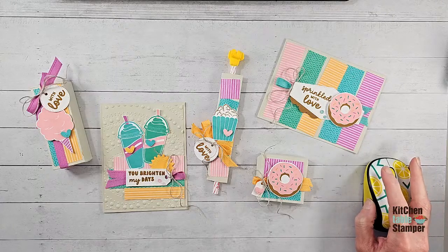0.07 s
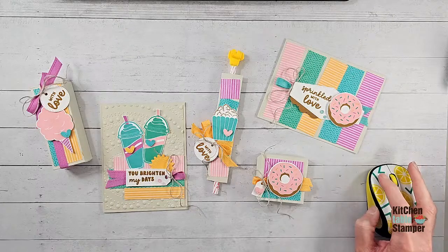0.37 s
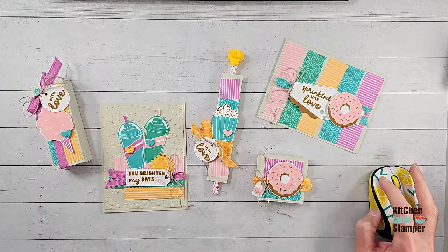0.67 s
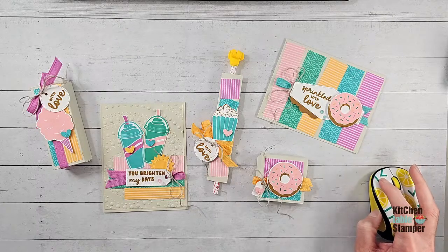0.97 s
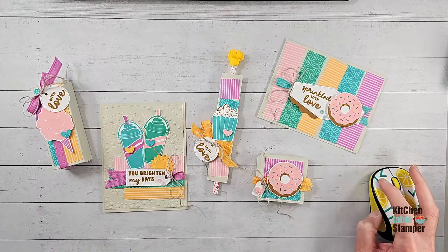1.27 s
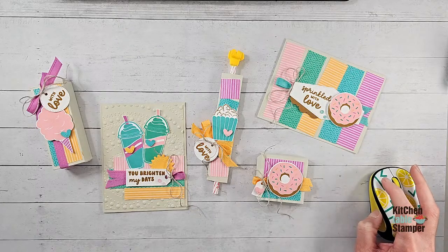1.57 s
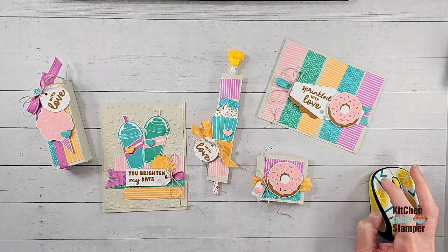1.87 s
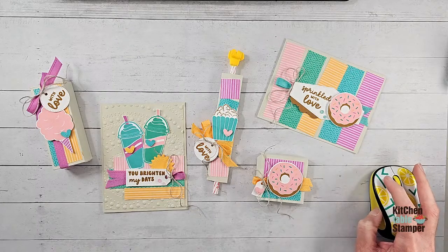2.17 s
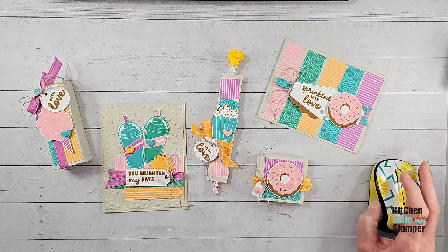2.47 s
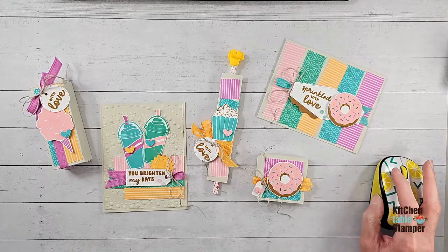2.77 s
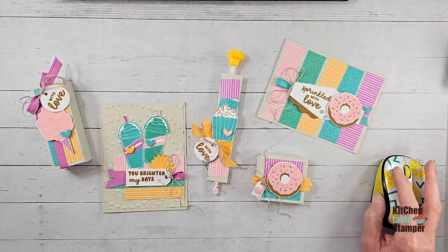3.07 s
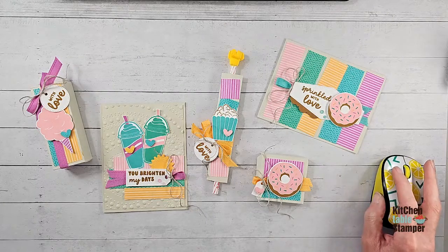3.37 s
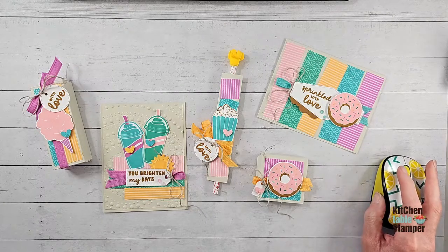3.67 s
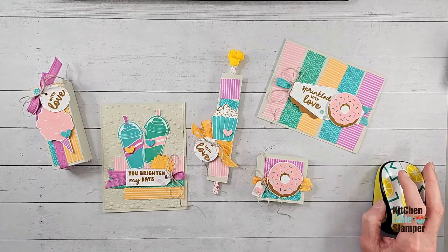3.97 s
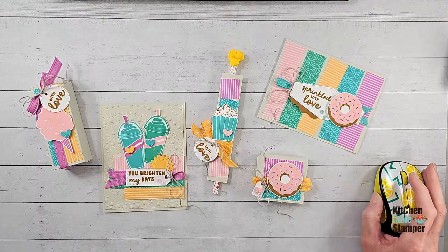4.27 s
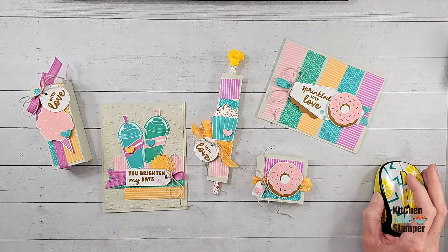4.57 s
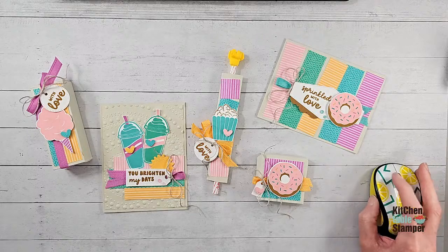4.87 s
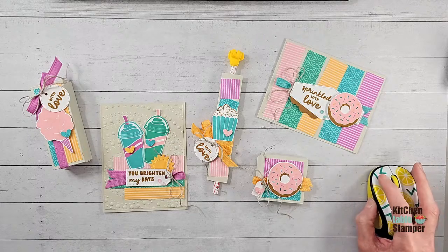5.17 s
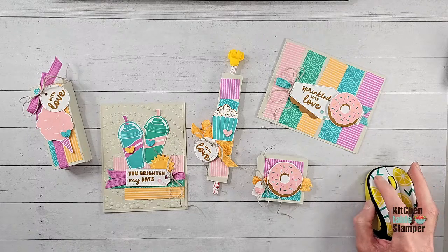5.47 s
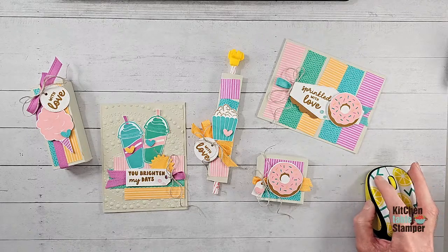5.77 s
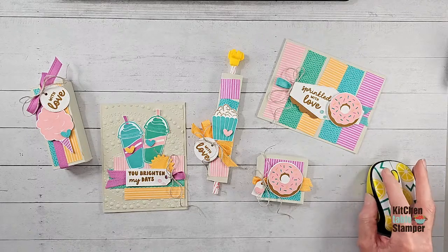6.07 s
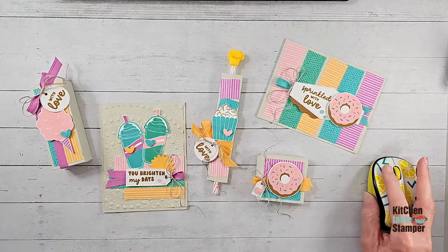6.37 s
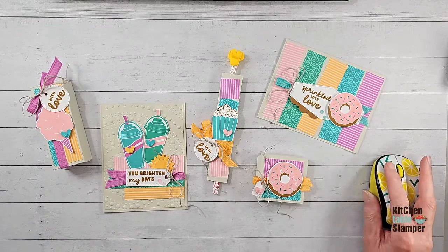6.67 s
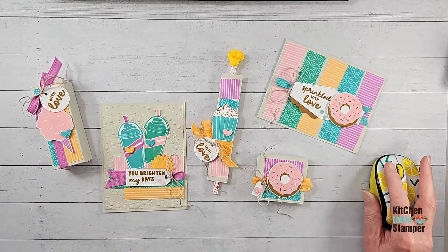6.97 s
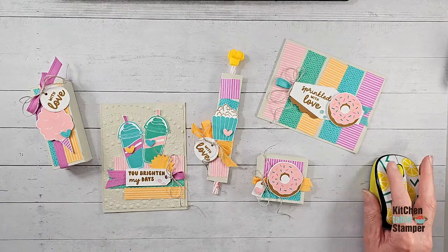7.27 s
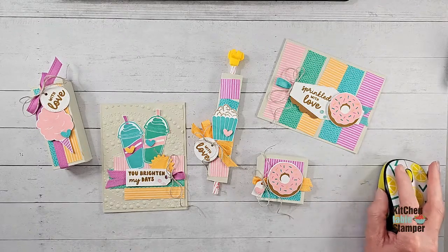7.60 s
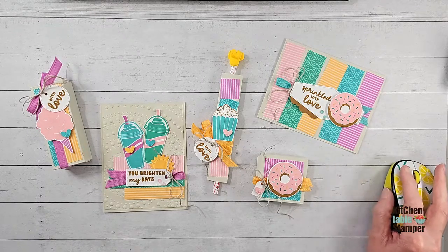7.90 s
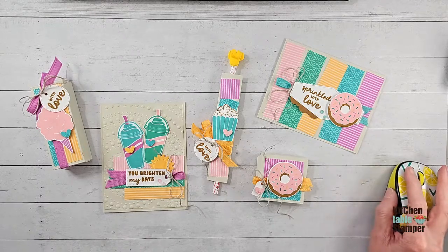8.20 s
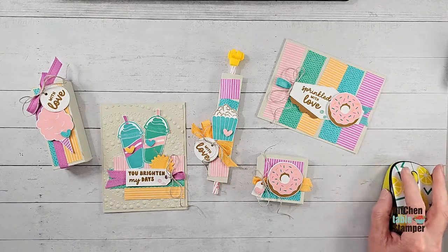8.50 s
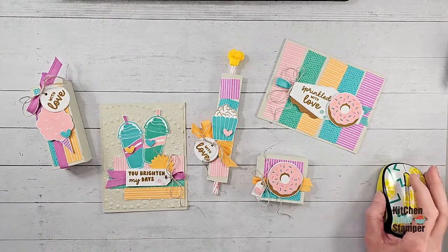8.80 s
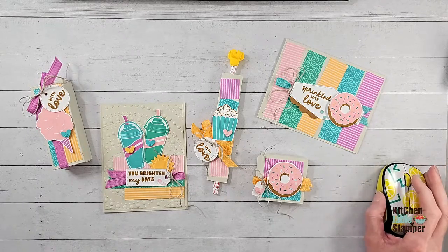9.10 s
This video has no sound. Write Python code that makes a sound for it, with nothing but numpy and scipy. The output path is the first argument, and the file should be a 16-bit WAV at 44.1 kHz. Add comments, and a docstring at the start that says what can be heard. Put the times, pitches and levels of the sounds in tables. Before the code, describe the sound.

A steady electrical hum with a thin buzz runs throughout in a small, quiet room, over low rumble and soft hiss. Close by, a computer mouse is clicked four times, at about 1.1, 3.2, 5.5 and 7.0 seconds. Each click is two crisp plastic snaps, the press and then the release roughly an eighth of a second later, with a slight table knock and a short room echo. A soft rush of background air swells gently around 3.3 seconds and sinks again. Fingers tick very lightly on the mouse shell at 0.5 seconds, several times between 3.1 and 5.6 seconds, and once more near 7.5. The mouse briefly scrapes and bumps on the table at about 5.8 and 7.1 seconds. From around 7 seconds a faint, wavering, motor-like drone fades in from far off and stays until the end at about 9 seconds.

```python
"""A small room with a craft table, where a computer mouse is clicked four times.
Mains hum and thin buzz sit over low rumble, a soft rush and hiss. Each press snaps the switch and
each release snaps it back, ringing the shell and button flap and knocking the table. Between clicks
fingers tick on the shell and the mouse scrapes and bumps. Late on, a faint far drone fades in."""
import sys
import numpy as np
from scipy import signal
from scipy.fft import rfft, irfft, next_fast_len
from scipy.io import wavfile
from scipy.ndimage import map_coordinates

SR = 44100
rng = np.random.default_rng(int(sys.argv[2]) if len(sys.argv) > 2 else 0)


def transcribe(u):
    """Save the signal u as a 16-bit wav file named by the first command-line argument.

    u: samples, shape (n,) or (channels, n), limited to [-1, 1]; the rate is SR.
    q: integer samples, one column per channel.
    """
    v = np.clip(np.atleast_2d(u).T, -1, 1)
    q = np.round(v * 32767).astype(np.int16)
    wavfile.write(sys.argv[1], SR, q)


N = 403074
TOP_HZ = 15700


def amp(db):
    """Decibels to gain."""
    return 10 ** (np.asarray(db) / 20)


def unit(x):
    """Scale to rms 1."""
    return x / np.sqrt(np.mean(x ** 2) + 1e-30)


def along(points, hz):
    """Read (Hz, value) points on a log frequency axis."""
    point_hz, values = np.transpose(points)
    return np.interp(np.log(hz + 1), np.log(point_hz + 1), values)


def wobble(knots_per_s):
    """Smooth random curve."""
    knots = rng.standard_normal(int(N * knots_per_s / SR) + 4)
    return map_coordinates(knots, [np.arange(N) * knots_per_s / SR])


def filtered(x, response):
    """Apply a complex response, given as a function of Hz."""
    size = next_fast_len(len(x) + SR // 4)
    return irfft(rfft(x, size) * response(np.fft.rfftfreq(size, 1 / SR)), size)[:len(x)]


def ring(force, modes):
    """A force rings (Hz, width Hz, relative dB) resonances; energy is preserved."""
    def body(f):
        return sum((-1) ** k * amp(db) * 1j * f * width / (hz * hz - f * f + 1j * f * width)
                   for k, (hz, width, db) in enumerate(modes))
    return unit(filtered(force, body)) * np.sqrt(np.mean(force ** 2))


def band(force, low_hz, high_hz):
    """Band-pass a force; energy is preserved."""
    sos = signal.butter(3, [low_hz, high_hz], "bandpass", fs=SR, output="sos")
    return unit(signal.sosfilt(sos, force)) * np.sqrt(np.mean(force ** 2))


def chatter(rise_s, decay_s):
    """Burst of tiny contacts that builds to rms 1 and dies away."""
    t = np.arange(SR // 4) / SR
    envelope = np.sqrt(np.minimum(t / rise_s, 1)) * np.exp(-np.maximum(t - rise_s, 0) / decay_s)
    return envelope * rng.choice([-1, 1], len(t))


def noise(spectrum):
    """Noise shaped by (Hz, dB per Hz) points."""
    return filtered(rng.standard_normal(N), lambda hz: amp(along(spectrum, hz)) * np.sqrt(SR / 2))


def add(track, start_s, x):
    """Mix x into the track."""
    part = track[round(start_s * SR):][:len(x)]
    part += x[:len(part)]


# Strong mains lines. Each row: harmonic number, rms level in dB.
HUM_LINES = [(1, -57), (2, -55.5), (3, -76.5), (4, -66), (5, -78), (6, -78.5), (7, -78), (8, -76.5),
             (9, -78.5), (10, -74), (11, -89), (12, -73), (13, -81.5), (14, -76.5), (15, -77.5), (18, -80),
             (21, -82.5), (22, -77), (24, -84), (26, -83.5), (28, -83), (36, -83), (38, -88.5), (43, -86.5),
             (44, -82.5), (48, -85), (59, -83.5), (60, -92), (64, -85.5), (72, -87.5)]
# Buzz envelope. Each row: frequency in Hz, typical level per line in dB.
BUZZ_SPECTRUM = [(180, -67.5), (400, -84), (1200, -89), (2000, -91.5), (3200, -91), (4500, -96.5),
                 (6300, -98), (8000, -103), (11000, -106), (15000, -109)]


def mains(mains_hz=60.027, weak_spikes=12, size=8192):
    """Hum and buzz: two sharp spikes about half a cycle apart, weaker ones scattered between."""
    harmonics = np.arange(1, int(TOP_HZ / mains_hz))
    spike_phases = np.r_[0, .506, rng.random(weak_spikes)]
    heights = np.r_[1, 1, .45 * rng.standard_normal(weak_spikes)]
    comb = np.exp(-2j * np.pi * np.outer(harmonics, spike_phases)) @ heights / np.linalg.norm(heights)
    lines = comb * amp(along(BUZZ_SPECTRUM, harmonics * mains_hz))
    for harmonic, db in HUM_LINES:
        i = round(harmonic) - 1
        lines[i] *= amp(db) / abs(lines[i])
    cycle = irfft(np.r_[0, lines], size) * size / np.sqrt(2)
    return np.interp(np.arange(N) / SR * mains_hz, np.arange(size) / size, cycle, period=1)


# Room noise spectra. Each row: frequency in Hz, density in dB per Hz before the layer's gain.
RUMBLE_SPECTRUM = [(4, -59.5), (10, -62.5), (17, -54.5), (25, -55), (33, -72.5), (44, -72.5), (57, -69.5),
                   (70, -78), (95, -81), (125, -78.5), (170, -90.5), (225, -89), (320, -99), (2000, -150)]
RUSH_SPECTRUM = [(150, -115), (330, -99), (450, -95), (600, -95), (700, -90.5), (800, -94), (900, -93),
                 (1020, -92), (1150, -96.5), (1600, -106), (2400, -114), (9000, -150)]
HISS_SPECTRUM = [(300, -112), (1500, -108), (3300, -110), (4500, -113.5), (6300, -117), (8000, -119.5),
                 (11000, -121.5), (15500, -123.5)]


def room_air(crest_s=3.34, swell_db=4.5, rise_s=0.36, fall_s=0.61, sink_db_per_s=0.36):
    """Wandering building rumble, steady hiss and a sinking rush that swells once, as if passing far off."""
    t = np.arange(N) / SR
    from_crest = (t - crest_s) / np.where(t < crest_s, rise_s, fall_s)
    rush_db = 0.47 - sink_db_per_s * t + swell_db / (1 + from_crest ** 2) + 0.5 * wobble(6)
    rumble_db = 0.03 + wobble(3.02)
    rumble = amp(rumble_db) * noise(RUMBLE_SPECTRUM)
    rush = amp(rush_db) * noise(RUSH_SPECTRUM)
    hiss = amp(-0.43) * noise(HISS_SPECTRUM)
    return rumble + rush + hiss


# Room decay. Each row: frequency in Hz, T60 in seconds.
ROOM_T60 = [(200, 0.27), (1000, 0.84), (5000, 0.32), (9000, 0.24), (15000, 0.27)]
# Sound the mouse throws toward the walls. Each row: frequency in Hz, relative tail level in dB.
WALL_SPREAD = [(300, 5), (5000, -6.5), (8000, 2.5), (15000, 0.5)]


def in_room(x, wet_db, onset_s):
    """Direct sound plus a diffuse tail that builds over onset_s."""
    hz, t, spectrum = signal.stft(rng.standard_normal(SR // 3), SR, nperseg=256)
    fade_db = along(WALL_SPREAD, hz)[:, None] - 60 * t / along(ROOM_T60, hz)[:, None]
    tail = signal.istft(spectrum * amp(fade_db), SR, nperseg=256)[1]
    tail *= np.minimum(np.arange(len(tail)) / SR / onset_s, 1) ** 2
    response = amp(wet_db) * tail / np.linalg.norm(tail)
    response[0] += 1
    return signal.fftconvolve(x, response)


# Finger touches. Each row: start in seconds, level in dB, decay in seconds, ring in Hz, width in Hz.
FINGER_TICKS = [(.505, -66, .002, 6000, 4000), (3.115, -71, .003, 9000, 4000), (4.09, -73, .008, 5170, 150),
                (4.55, -72, .008, 5200, 300), (4.984, -70, .006, 5100, 300), (5.067, -74, 0.024, 7650, 120),
                (5.33, -69, .002, 11000, 5000), (5.412, -65, .001, 11000, 6000),
                (5.600, -63, .003, 5200, 1490), (7.453, -69, .004, 9000, 6000)]


def finger_ticks():
    """Each light touch rings one resonance of the shell."""
    out = np.zeros(N)
    for start_s, db, decay_s, hz, width_hz in FINGER_TICKS:
        tick = ring(chatter(.0006, decay_s), [(hz, width_hz, 0)])
        add(out, start_s, amp(db) * in_room(tick, wet_db=-3, onset_s=.006))
    return out


def snap_force(rise_s, decay_s):
    """The switch spring flips: a few milliseconds of hard contacts with a near-flat spectrum."""
    force = chatter(rise_s, decay_s)
    envelope = abs(force)
    for _ in range(3):
        whitened = irfft(np.exp(1j * np.angle(rfft(force))), len(force))
        force = whitened * np.minimum(8 * envelope, 1)
    return unit(force) * np.sqrt(np.mean(envelope ** 2))


# Button strokes. Each row: start in seconds, level in dB before trim, table knock and button flap
# in dB relative to the snap.
BUTTON_PRESSES = [(1.1058, -40, -5, -22), (3.2331, -39, -4, -19), (5.5018, -40, -3.5, -6.5),
                  (6.9562, -39.5, -3.5, -18)]
BUTTON_RELEASES = [(1.2225, -41.5, -15, -8), (3.3584, -38.5, -6, -5), (5.6282, -41, -1.5, -0.5),
                   (7.0666, -42, 0, -7)]
# Resonances of the switch and shell (button held, button free), the finger-damped plastic flap and
# the table. Each row: frequency in Hz, width in Hz, relative gain in dB.
HELD_MODES = [(1730, 370, -17), (3140, 190, -13.5), (3930, 200, -13.5), (4400, 120, -13), (5150, 420, -6),
              (5370, 470, -2), (6050, 310, -5), (7510, 126, 5), (7850, 39, -8), (9000, 330, -12.5),
              (9900, 220, -9.5), (11530, 380, -6.5), (12300, 180, -1.5), (13100, 300, -17),
              (15200, 550, -14)]
FREE_MODES = [(1225, 94, -2.5), (1990, 460, -7), (3290, 130, -4.5), (3910, 120, -7), (4150, 96, -5.5),
              (5850, 440, -4.5), (7290, 120, 1.5), (8660, 350, -9), (9470, 280, -5), (10020, 250, -5),
              (11300, 330, -4.5), (12000, 600, -6), (13600, 520, -6), (14100, 400, -8), (15500, 560, -8)]
FLAP_MODES = [(4900, 190, 3), (5170, 170, -4.5)]
TABLE_MODES = [(325, 110, -6), (500, 160, -6.5), (780, 170, -5), (910, 72, -1), (975, 51, 2)]


def switch_clicks(strokes, shell_modes, rise_s, decay_s, wet_db, trim_db=-3.5):
    """The spring's jolt rings the switch, shell and flap and knocks the table."""
    out = np.zeros(N)
    for start_s, db, knock_db, flap_db in strokes:
        force = snap_force(rise_s, decay_s)
        snap = ring(force, shell_modes)
        flap = amp(flap_db) * ring(force, FLAP_MODES)
        knock = amp(knock_db) * ring(force, TABLE_MODES)
        add(out, start_s, amp(db + trim_db) * in_room(snap + flap + knock, wet_db, onset_s=.002))
    return out


# Mouse movements. Each row: start, rise and decay in seconds, thud and scrape levels in dB,
# low and high scrape band edges in Hz.
MOUSE_SHIFTS = [(5.229, .014, .026, -72, -70, 5000, 13000), (5.789, 0.003, .011, -49.5, -58, 910, 1900),
                (5.803, .02, 0.036, -56.5, -64, 400, 3000), (7.102, 0.0026, 0.0064, -52.5, -67, 1500, 7000),
                (7.1135, 0.0011, 0.0067, -49.5, -51, 800, 6400)]


def mouse_shifts():
    """The mouse scrapes on its feet and thuds on the table."""
    out = np.zeros(N)
    for start_s, rise_s, decay_s, thud_db, scrape_db, low_hz, high_hz in MOUSE_SHIFTS:
        thud = amp(thud_db) * ring(chatter(rise_s, decay_s), TABLE_MODES)
        scrape = amp(scrape_db) * band(chatter(rise_s, decay_s), low_hz, high_hz)
        add(out, start_s, in_room(thud + scrape, wet_db=-10, onset_s=.006))
    return out


def drone_gain(full_db, full_s, rise_db_per_s, hold_end_s=8.65, fall_db_per_s=5):
    """Gain of one drone partial: fade in, hold, fade out."""
    t = np.arange(N) / SR
    fade_in_db = rise_db_per_s * np.maximum(full_s - t, 0)
    fade_out_db = fall_db_per_s * np.maximum(t - hold_end_s, 0)
    return amp(full_db - fade_in_db - fade_out_db)


def far_drone(pitch_hz=247.4, beat_hz=10, beat_db=-3, waver_hz=2.21):
    """A motor-like tone wavers and beats with a weaker one just above; its octave flutters."""
    def phase(hz):
        return 2 * np.pi * np.cumsum(hz + waver_hz * wobble(12)) / SR
    fundamental = np.sin(phase(pitch_hz)) + amp(beat_db) * np.sin(phase(pitch_hz + beat_hz))
    octave = wobble(22) * np.sin(2 * phase(pitch_hz)) + wobble(22) * np.cos(2 * phase(pitch_hz))
    return (drone_gain(full_db=-59.5, full_s=8.2, rise_db_per_s=20.4) * unit(fundamental)
            + drone_gain(full_db=-70, full_s=7.13, rise_db_per_s=11) * unit(octave))


def scene():
    """The mouse close by over the room's background, in mono."""
    presses = switch_clicks(BUTTON_PRESSES, HELD_MODES, rise_s=.0013, decay_s=.0017, wet_db=-10)
    releases = switch_clicks(BUTTON_RELEASES, FREE_MODES, rise_s=.00065, decay_s=.0021, wet_db=-9.5)
    background = mains() + room_air() + far_drone()
    return (background + finger_ticks() + presses + releases + mouse_shifts())[None]


def record(dry):
    """Brick-wall low-pass at TOP_HZ."""
    return np.array([filtered(x, lambda hz: hz < TOP_HZ) for x in dry])


dry = scene()
out = record(dry)
transcribe(out)
```